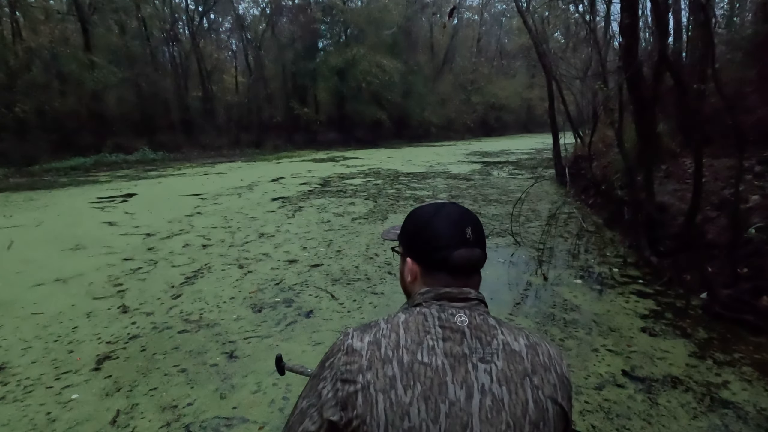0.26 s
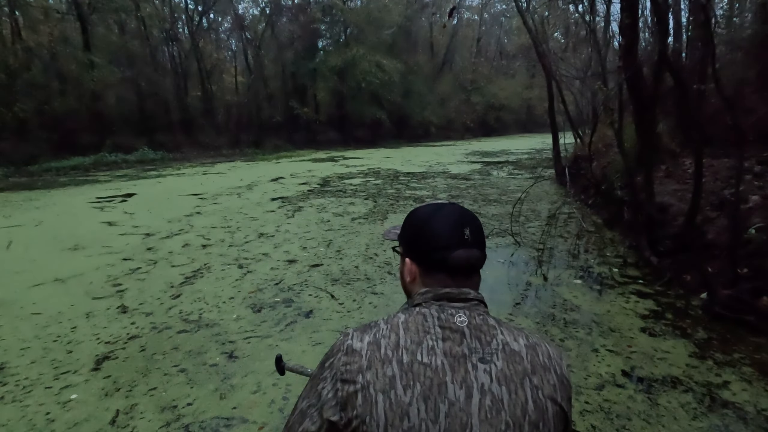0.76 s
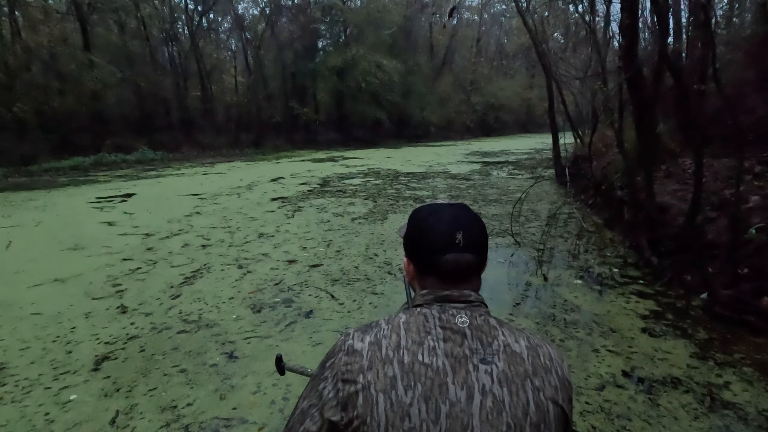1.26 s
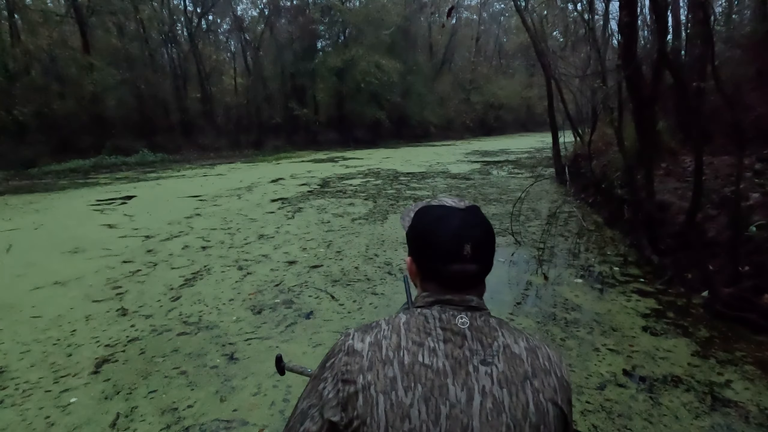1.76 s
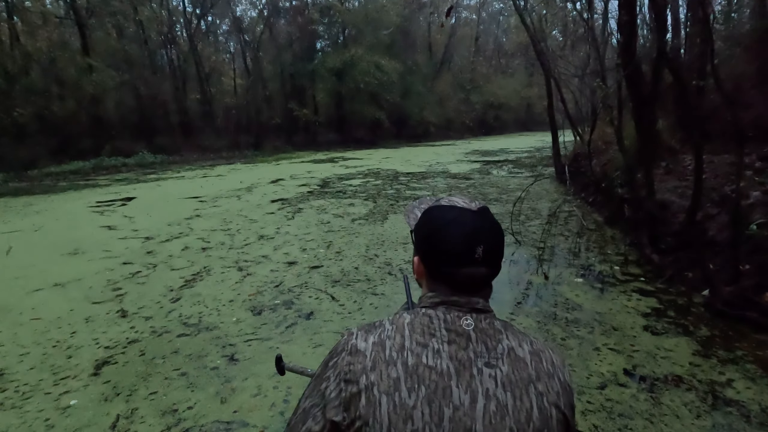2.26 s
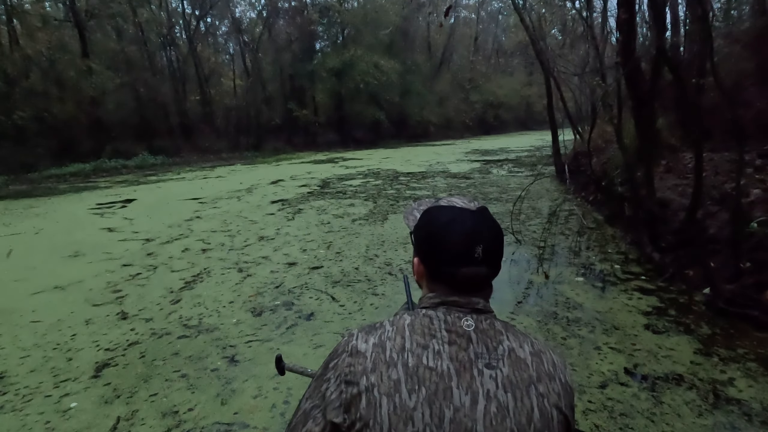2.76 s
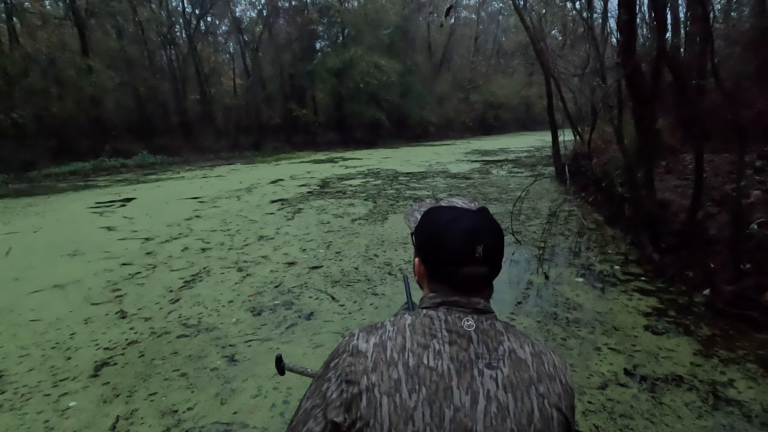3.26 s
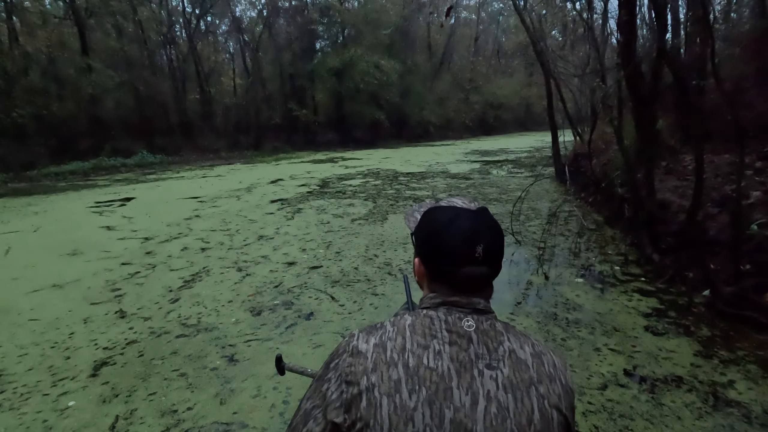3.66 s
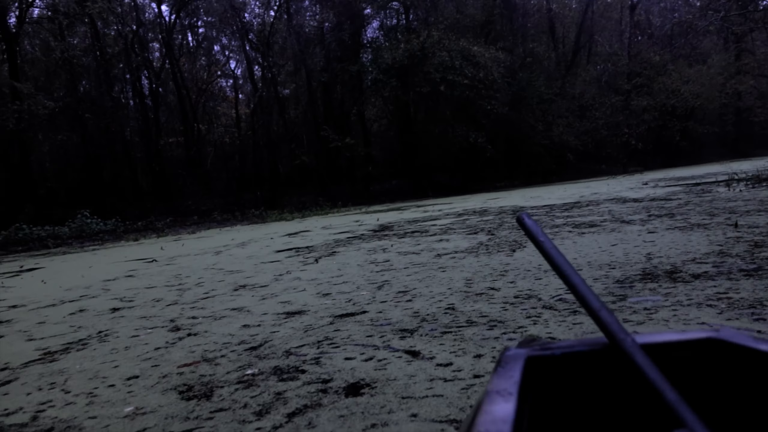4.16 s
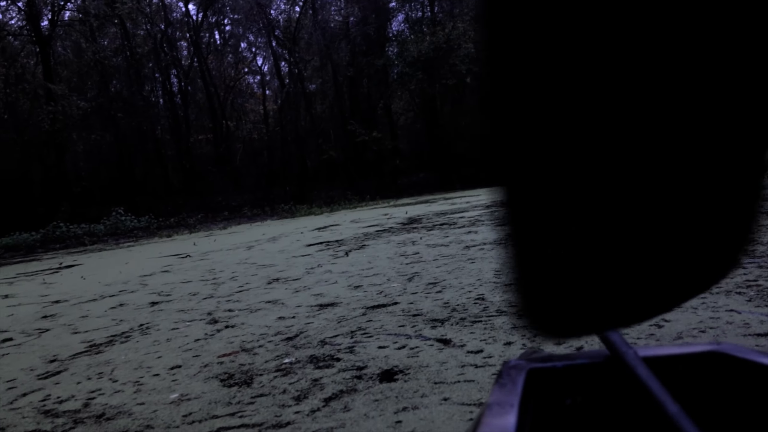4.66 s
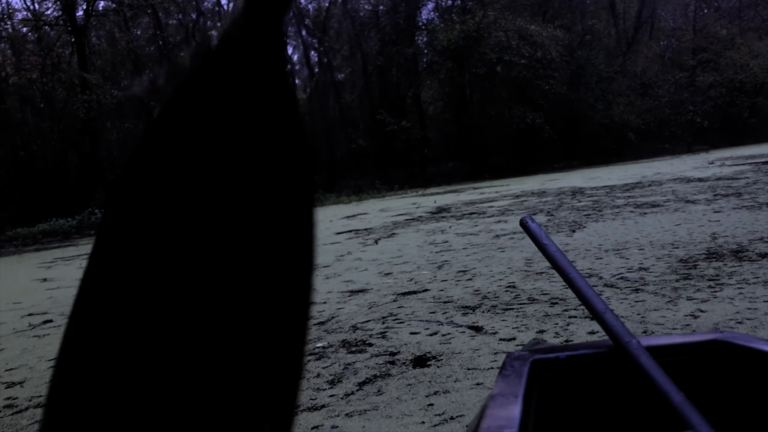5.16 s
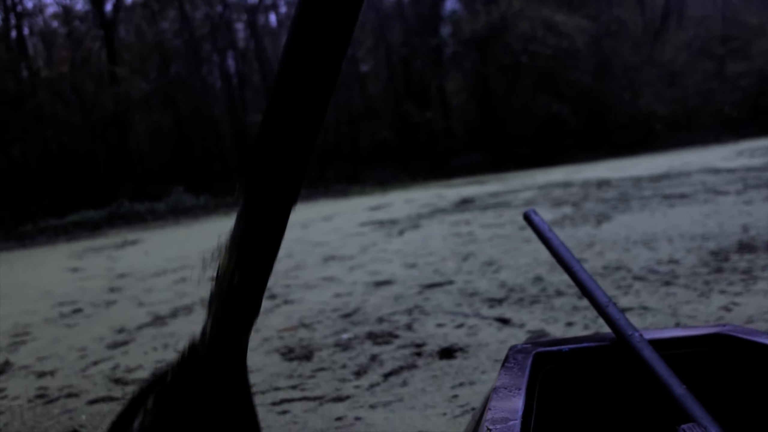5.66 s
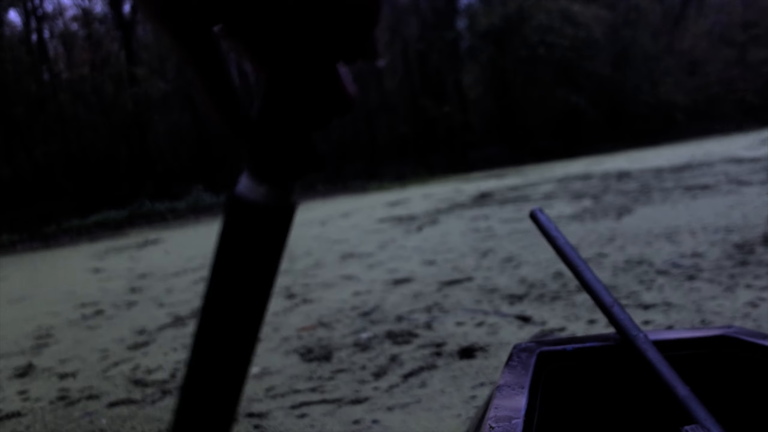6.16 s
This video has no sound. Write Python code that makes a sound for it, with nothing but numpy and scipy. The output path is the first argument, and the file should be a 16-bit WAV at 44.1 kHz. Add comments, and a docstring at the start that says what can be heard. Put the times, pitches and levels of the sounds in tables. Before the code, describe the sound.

A wooded swamp opens with full, steady forest air and a high, pulsing drone of crickets. Hoarse bird cries and nasal squeals echo from far in the trees, mostly in the first 2.5 seconds, among short sharp chips. A nearer bird whistles brief arched notes from 1 to 3.8 seconds. The boat bumps softly at about 0.4 and 2.8 seconds. A lower cricket trills at the start and around 2.5 seconds, and faint, thin songbird notes follow near 3 seconds. At 3.9 seconds the sound cuts to a much quieter spot with faint crickets, a fine rustle and small drips. Close by, water falls from a paddle just after 5 seconds, with one plop at about 5.2. The paddle knocks on the hull at 5.5 seconds, ringing it briefly, with lighter touches around 4.3, 4.8, 6 and 6.2 seconds.

```python
"""Dusk on a wooded swamp, from a small boat at rest. It opens on loud forest air and a drone of crickets
pulsing their wings. Hoarse cries and squeals come from far in the trees while a nearer bird whistles
arched notes, among short pitched chips and soft boat bumps. At 3.9 s the scene cuts to a much quieter
spot with the same drone, a fine rustle and drips. Water falls from a held paddle and traps a bubble with
one plop, then the paddle knocks on the hull and rings it, with lighter touches before and after."""
import sys
import numpy as np
from scipy import signal
from scipy.fft import rfft, irfft, next_fast_len
from scipy.io import wavfile

SR = 44100
rng = np.random.default_rng(int(sys.argv[2]) if len(sys.argv) > 2 else 0)


def transcribe(u):
    """Save the signal u as a 16-bit wav file named by the first command-line argument.

    u: samples, shape (n,) or (channels, n), limited to [-1, 1]; the rate is SR.
    q: integer samples, one column per channel.
    """
    v = np.clip(np.atleast_2d(u).T, -1, 1)
    q = np.round(v * 32767).astype(np.int16)
    wavfile.write(sys.argv[1], SR, q)


N = 282681
TIME = np.arange(N) / SR


def from_db(db):
    return 10 ** (np.asarray(db) / 20)


def unit_rms(x):
    return x / np.sqrt(np.mean(x ** 2) + 1e-20)


def gate(start, end, fade):
    """Opens between two moments, with linear fades."""
    return np.clip((TIME - start) / fade, 0, 1) * np.clip((end - TIME) / fade, 0, 1)


def decay(start, t60):
    """Silence, then an instant attack and an exponential tail."""
    return (TIME >= start) * from_db(-60 * np.clip((TIME - start) / t60, 0, 3))


def drift(rate):
    """A random modulator of rms 1 that turns about rate times a second."""
    knots = rng.standard_normal(8192)
    return unit_rms(np.interp(TIME * rate, np.arange(len(knots)), knots))


def coloured(spectrum):
    """Noise of rms 1 shaped by an EQ curve."""
    hz, db = np.transpose(spectrum)
    size = next_fast_len(N, real=True)
    log_hz = np.log(np.fft.rfftfreq(size, 1 / SR) + 1)
    gain = from_db(np.interp(log_hz, np.log(hz), db, left=-np.inf))
    return unit_rms(irfft(rfft(rng.standard_normal(size)) * gain, size)[:N])


def band(x, low_hz, high_hz):
    """A band-pass with 12 dB an octave on each side."""
    edges = np.clip([low_hz, high_hz], 10, .45 * SR)
    return signal.sosfilt(signal.butter(2, edges, "band", fs=SR, output="sos"), x + 1e-18)


def low_pass(x, hz):
    """A steep high cut."""
    return signal.sosfilt(signal.ellip(10, .1, 70, hz, fs=SR, output="sos"), x)


def voice(hz, partials=((1, 0),)):
    """A tone on a moving pitch, from (harmonic, level [dB]) pairs; a partial at 0 dB has rms 1."""
    phase = 2 * np.pi * np.cumsum(hz) / SR
    return np.sqrt(2) * sum(from_db(db) * np.sin(k * phase) for k, db in partials)


def woods(x, t60):
    """Forest reverb: trunks scatter a sound into a dense tail of equal energy."""
    tail = rng.standard_normal(SR) * from_db(-60 * TIME[:SR] / t60)
    return signal.fftconvolve(x, tail / np.linalg.norm(tail))[:N]


# EQ of the noise floor at the first spot: (frequency [Hz], relative level [dB])
HISS_EQ = [(30, 3), (500, -2), (1500, -17), (3500, -22), (5000, -18.5), (7000, -3), (9500, -7),
           (12000, 9.5), (14000, 0)]
def hiss(level_db=-83.5):
    """A faint, wide hiss, independent in each channel."""
    return from_db(level_db) * np.array([coloured(HISS_EQ), coloured(HISS_EQ)])


# Air tone of the second spot: (frequency [Hz], relative level [dB])
QUIET_AIR_EQ = [(30, -22), (100, -10), (180, -6), (245, -1), (340, 0), (660, 2.5), (1000, 1.3), (3500, 0),
                (6500, -0.5), (9000, -4), (15500, -14.5)]
def quiet_air(level_db=-71):
    """A thin, steady bed of forest air."""
    return from_db(level_db) * coloured(QUIET_AIR_EQ)


# Air tone of the first spot: (frequency [Hz], relative level [dB])
LOUD_AIR_EQ = [(22, -35), (35, -8), (58, 2), (130, 1.5), (195, 6), (290, -1), (690, 1.5), (940, -2.5),
               (1250, 2), (3900, -0.8), (5600, -8), (7000, -13.5), (9000, -28), (12000, -26), (13800, -59)]
def loud_air(level_db=-51):
    """A full bed of forest air whose level wavers slightly."""
    return from_db(level_db + .5 * drift(14)) * coloured(LOUD_AIR_EQ)


# Colour of the rustle: (frequency [Hz], relative level [dB])
RUSTLE_EQ = [(3000, -18), (7000, -8), (10000, -3.5), (13000, -3.5), (15800, -3)]
# Swells of the rustle: (time [s], length [s], relative level [dB])
RUSTLE_SWELLS = [(3.8, 0.87, -68), (4.72, 0.35, -74), (5.08, .53, -70.3), (6.05, .45, -78)]
def rustle(grains_per_s=200, grain_db=-5, rest_db=-81):
    """A soft, bright hiss in rounded swells, sprinkled with tiny uneven crackles."""
    grains = (rng.random(N) < grains_per_s / SR) * rng.standard_normal(N)
    crackle = from_db(grain_db) * unit_rms(band(grains, 8500, 21000))
    power = from_db(rest_db) ** 2
    for start, length, db in RUSTLE_SWELLS:
        progress = np.clip((TIME - start) / length, 0, 1)
        power += (from_db(db) * np.sin(np.pi * progress)) ** 2
    flicker = from_db(1.7 * drift(90))
    return np.sqrt(power) * flicker * (coloured(RUSTLE_EQ) + crackle)


# The wash of distant crickets: (frequency [Hz], relative level [dB])
FAR_CRICKETS_EQ = [(3600, -51), (4100, -11), (4400, -3.5), (4600, -0.5), (4800, 2.5), (5020, -3.5),
                   (5250, -9), (5700, -50)]
def cricket_chorus(centre_hz=4740, spread_hz=160, pulses_per_s=60, droop_hz=130, near_db=-4, count=10):
    """Near crickets pulse on their own pitches; countless far ones merge into a narrow hiss."""
    near = np.zeros(N)
    detunes = np.linspace(-1.5, 1.5, count)
    for detune, speed, offset in zip(detunes, rng.standard_normal(count), rng.random(count)):
        stroke_rate = pulses_per_s * (1 + .06 * speed + .02 * drift(8))
        stroke = (offset + np.cumsum(stroke_rate) / SR) % 1
        # the wing slows through each stroke, so the pitch droops
        hz = centre_hz + spread_hz * detune - droop_hz * (stroke - .5) + 45 * drift(120)
        pulses = np.sin(np.pi * stroke) ** 4
        near += pulses * voice(hz) * np.exp(-detune ** 2 / 2)
    return unit_rms(from_db(near_db) * unit_rms(near) + coloured(FAR_CRICKETS_EQ))


# Trills of one lower cricket: (time [s], length [s], relative level [dB])
TRILLS = [(-.03, 0.71, -52.5), (2.466, 0.69, -49.5), (5.7, 0.58, -63)]
def cricket_trills(pitch_hz=4087, pulses_per_s=38.5, wet_db=-6):
    """Each train of pulses swells quickly and fades slowly; the trees smear it."""
    envelope = np.zeros(N)
    for start, length, db in TRILLS:
        age = TIME - start
        swell = np.interp(age / length, [0, .19, .33, 1], [.072, .78, .81, 0])
        envelope += from_db(db) * swell * np.sin(np.pi * pulses_per_s * age) ** 4
    dry = envelope * voice(pitch_hz + 24 * drift(160))
    return dry + from_db(wet_db) * woods(dry, t60=.49)


# Low bumps of the boat: (time [s], length [s], level [dB], centre [Hz], width [octaves])
BUMPS = [(0.403, 0.076, -51, 185, 1.1), (2.75, 0.11, -52.5, 180, 0.99), (4.403, .14, -84, 241, .6),
         (5.144, 0.073, -67.5, 330, 1.1), (5.551, 0.054, -74, 320, 0.75), (5.68, 0.2, -80.5, 252, .45)]
def boat_bumps():
    """Weight shifts in the boat: dull, soft thuds."""
    out = np.zeros(N)
    for start, length, db, hz, width in BUMPS:
        edge = 2 ** (width / 2)
        thud = unit_rms(band(rng.standard_normal(N), hz / edge, hz * edge))
        out += from_db(db) * gate(start, start + length, length / 2) * thud
    return out


# Short pitched chips and ticks before the cut, water drips after it:
# (time [s], level before the filter [dB], pitch [Hz])
TICKS = [(.029, -36.5, 2760), (.05, -36.5, 2720), (.296, -38.5, 3200), (.483, -36, 2740),
         (.643, -36.5, 2500), (.75, -33, 3390), (.874, -35, 3800), (1.36, -47.5, 6500), (1.872, -56, 11000),
         (2.69, -37.5, 3280), (2.76, -34.5, 4300), (2.998, -58, 10500), (3.532, -39, 2570),
         (4.265, -48, 5370), (4.355, -55, 9700), (4.638, -51, 6470), (4.796, -57, 13000),
         (4.836, -57, 14600), (5.09, -53, 12900), (5.294, -43, 5940), (5.313, -42, 8700),
         (5.531, -47.5, 5100), (6.255, -58, 2960)]
def ticks(click_db=-1, ring_db=-3.5):
    """Each is a very short click of noise and a brief ring around its own pitch."""
    out, t = np.zeros(N), TIME[:SR // 10]
    for start, db, hz in TICKS:
        t60 = .018 * (3000 / hz) ** .39   # high ones die sooner
        click = from_db(click_db) * rng.standard_normal(len(t))
        ring = from_db(ring_db) * np.sin(2 * np.pi * hz * t)
        tick = band((click + ring) * from_db(db - 60 * t / t60), .74 * hz, 1.38 * hz)
        at = round(start * SR)
        out[at:at + len(t)] += tick[:N - at]
    return out


def far_calls(calls, partials, glide, rough, arch, dry_db, wet_db):
    """Bird calls blurred by the trees; glide, rough and arch bend the pitch by shares of it."""
    dry, shake = np.zeros(N), 1 + rough * drift(220)
    for start, length, pitch_hz, db in calls:
        on = (TIME >= start) & (TIME < start + length)
        progress = (TIME[on] - start) / length
        bow = np.abs(np.sin(np.pi * progress))
        bend = (1 + glide * (progress - .5)) * (1 + arch * (bow - 2 / np.pi))
        dry[on] += from_db(db) * np.sqrt(bow) * voice(pitch_hz * bend * shake[on], partials)
    return from_db(dry_db) * dry + from_db(wet_db) * woods(dry, t60=.96)


# Notes of a small songbird: (time [s], length [s], pitch [Hz], relative level [dB])
LISPS = [(2.93, .15, 7950, -73), (3.12, .1, 8000, -74), (3.3, .108, 7750, -71)]
def songbird_lisps():
    """Thin, high notes that slip slightly downward."""
    return far_calls(LISPS, [(1, 0)], glide=-.04, rough=.034, arch=.023, dry_db=-2, wet_db=-5)


# Distant squeals: (time [s], length [s], pitch [Hz], relative level [dB])
SQUEALS = [(.35, .15, 704, -56), (.52, .17, 752, -61.5), (1.15, .14, 687.6, -55), (1.27, 0.112, 716, -58),
           (2.06, 0.151, 687, -59), (2.2, .16, 765, -63.5)]
# Their timbre: (harmonic [number], relative level [dB])
SQUEAL_TIMBRE = [(1, -5), (2, 1), (3, 1.5), (4, -28)]
def bird_squeals():
    """Rising calls, made nasal by strong second and third harmonics."""
    return far_calls(SQUEALS, SQUEAL_TIMBRE, glide=.0676, rough=.025, arch=.02, dry_db=-.5, wet_db=-4)


# Cries deep in the woods: (time [s], length [s], lower pitch [Hz], lower gain [dB], upper gain [dB])
CRIES = [(.05, 0.28, 1339, -55.5, -62.5), (0.348, 0.14, 1405, -60, -69), (.5, .13, 1418, -53, -63),
         (0.609, .18, 1269, -50.7, -57), (1.0, 0.18, 1305, -52.5, -59), (1.15, .14, 1345, -52.5, -56.5),
         (1.42, .2, 1290, -54, -55.5), (1.649, 0.117, 1385, -58.5, -69), (1.86, .26, 1315, -55.5, -56.5),
         (2.34, 0.122, 1410, -55, -68), (3.38, 0.065, 1370, -57, -70)]
def bird_cries(upper_hz=1794):
    """Hoarse, two-voiced cries; the upper voice centres on the same pitch every time."""
    lower = [(start, length, hz, db) for start, length, hz, db, _ in CRIES]
    upper = [(start, length, upper_hz, db) for start, length, _, _, db in CRIES]
    return far_calls(lower + upper, partials=[(1, 1), (2, -14.5)],
                     glide=-.0307, rough=.0559, arch=.0484, dry_db=-2.5, wet_db=-1.5)


# Whistles of the nearest bird: (time [s], length [s], rise [s], top pitch [Hz], fall [s], level [dB],
# overtone gain [dB], shake [share of pitch])
WHISTLES = [(1.031, 0.069, .03, 1305, .13, -54.5, -22, .018),
            (1.465, .105, .05, 1453, 0.16, -49, -12, .016),
            (1.564, 0.098, 0.017, 1432, 0.27, -48, -18, .011),
            (1.885, 0.099, .035, 1375, .075, -48.5, -22, 0.014),
            (2.425, 0.099, 0.038, 1480, .062, -46.5, -15, 0.0079),
            (2.836, .08, 0.0374, 1416, 0.039, -51, -24, .005),
            (3.194, .215, 0.041, 1450, .058, -45.5, -27, .004),
            (3.641, .11, 0.0423, 1455, 0.0415, -46, -24, 0.0037)]
# Their overtones: (harmonic [number], relative level [dB])
WHISTLE_OVERTONES = [(2, 0.5), (3, 0), (4, -3.5)]
def bird_whistles(scoop_share=.24, sag_share=.295, dim_db=34, tiring_db_per_s=25, wet_db=-9):
    """Each nearly pure note scoops up to its top and sinks away; a faint forest tail follows."""
    dry = np.zeros(N)
    for start, length, rise, top_hz, fall, db, overtones_db, shake in WHISTLES:
        from_top = TIME - start - rise
        past_top = np.maximum(from_top, 0)
        scoop = scoop_share * np.clip(from_top / rise, -1, 0) ** 2
        sag = sag_share * (1 - 1 / (1 + (past_top / fall) ** 2))
        hz = top_hz * (1 - scoop - sag) * (1 + shake * drift(170))
        tone = voice(hz) + from_db(overtones_db) * voice(hz, WHISTLE_OVERTONES)
        # softer below the top pitch, and fading steadily once past it
        loss_db = dim_db * (scoop + sag) + tiring_db_per_s * past_top
        dry += from_db(db - loss_db) * gate(start, start + length, fade=.011) * tone
    return dry + from_db(wet_db) * woods(dry, t60=.34)


# Blobs of water falling from the paddle: (time [s], relative level [dB])
SPLASHES = [(5.0192, -54.5), (5.1494, -41), (5.241, -60.5)]
def splashes(entry_s=.0029, slap_db=5, patter_db=-14):
    """A bright spray holds while each blob enters; a duller slap and falling droplets follow."""
    spray, slap, patter = np.zeros((3, N))
    for start, db in SPLASHES:
        entering = (TIME >= start) * (TIME < start + entry_s)
        spray += from_db(db) * (entering + decay(start + entry_s, t60=.035))
        slap += from_db(db + slap_db) * decay(start + .003, t60=.06)
        patter += from_db(db + patter_db) * decay(start + .012, t60=.25)
    white = rng.standard_normal((3, N))
    droplets = band(patter * from_db(4 * drift(500)) * white[2], 700, 6000)
    return band(spray * white[0], 3300, 19000) + band(slap * white[1], 800, 3500) + droplets


def bubble(start=5.153, length=.064, lowest_hz=860, turn_s=.031, octave_s=.038, pop_db=-52, ring_db=-66):
    """The largest blob traps a bubble: a pop, then a ring that dips and rises as it nears the surface."""
    age = np.clip(TIME - start, 0, length)
    hz = lowest_hz * (1 + ((age - turn_s) / octave_s) ** 2)
    wobble = 1 + .06 * drift(400)
    envelope = from_db(pop_db) * decay(start, t60=.045) + from_db(ring_db)
    return gate(start, start + length, fade=.002) * envelope * voice(hz * wobble)


# Paddle hits on the hull: (time [s], relative level [dB])
KNOCKS = [(4.322, -54), (4.783, -53.5), (5.4923, -37), (5.983, -51.5), (6.173, -49.5)]
# Resonances of the hull: (frequency [Hz], relative level [dB], decay by 60 dB [s])
HULL_MODES = [(563, -16, 0.086), (677, -14, 0.082), (990, -6.5, 0.037), (1083, -5, 0.065),
              (1350, -6, 0.027), (1500, -10, 0.045), (1860, -14, 0.049), (2190, -6, 0.04),
              (2500, -14, 0.016)]
def hull_knocks(ring_db=-5.5, crack_db=2, ring_growth=.52):
    """Each touch of the paddle gives a short crack and rings the hull, light touches hardly at all."""
    impulses, crack = np.zeros((2, N))
    hardest_db = max(db for _, db in KNOCKS)
    for start, db in KNOCKS:
        impulses[round(start * SR)] = from_db(db + ring_growth * (db - hardest_db))
        crack += from_db(db + crack_db) * decay(start, t60=.019)
    t = TIME[:SR // 4]
    ring = sum(from_db(db + ring_db - 60 * t / t60) * np.cos(2 * np.pi * hz * t)
               for hz, db, t60 in HULL_MODES)
    hits = signal.fftconvolve(impulses, ring)[:N] + crack * rng.standard_normal(N)
    return band(band(hits, 350, 2350), 280, 2350)   # the thin shell radiates no bass


def loud_spot(chorus, trills, chorus_db=-49):
    """Forest air, crickets and birds sit in the centre; only the hiss is wide."""
    bed = loud_air() + hiss() + from_db(chorus_db) * chorus + trills
    return bed + bird_cries() + bird_squeals() + songbird_lisps() + bird_whistles()


def quiet_spot(chorus, trills, chorus_db=-65, lean_db=1.2, spread_db=-8, delay_s=.016):
    """A soft, wide bed with the crickets a little left; water and knocks up close."""
    sides = np.array([[1], [-1]])
    crickets = (from_db(chorus_db) * chorus + trills) * from_db(lean_db * sides)
    bed = quiet_air() + rustle() + crickets
    # widened by a short delayed copy, opposite in each channel
    stereo_spread = from_db(spread_db) * np.roll(bed, round(delay_s * SR), axis=1) * sides
    wide_splashes = splashes() + from_db(-12) * splashes() * sides
    return bed + stereo_spread + wide_splashes + bubble() + hull_knocks()


def scene(cut_s=3.9):
    """The loud spot, with its duller top, cuts hard to the quiet one."""
    chorus, trills = cricket_chorus(), cricket_trills()
    small_sounds = ticks() + boat_bumps()
    first = low_pass(loud_spot(chorus, trills) + small_sounds, hz=13500)
    second = quiet_spot(chorus, trills) + small_sounds
    fade_out = np.clip((cut_s - TIME) / .014, 0, 1)
    fade_in = np.clip((TIME - cut_s) / .008, 0, 1)
    return first * fade_out + second * fade_in


def record(dry):
    """A steep high cut on the whole mix."""
    return low_pass(dry, hz=15800)


dry = scene()
out = record(dry)
transcribe(out)
```